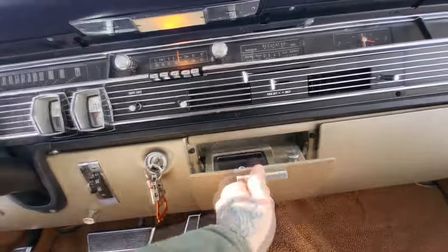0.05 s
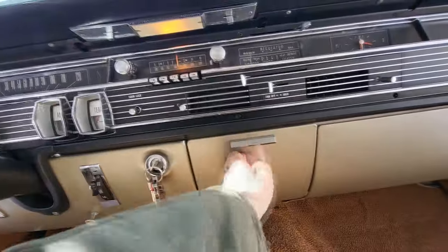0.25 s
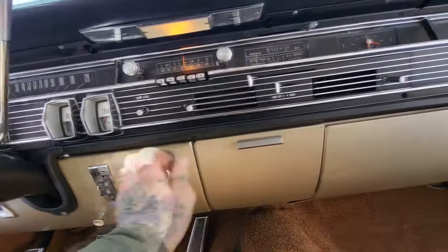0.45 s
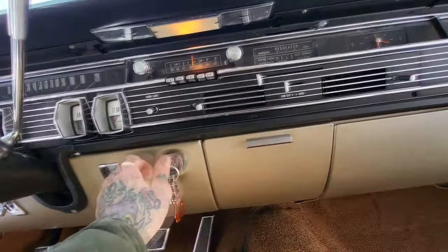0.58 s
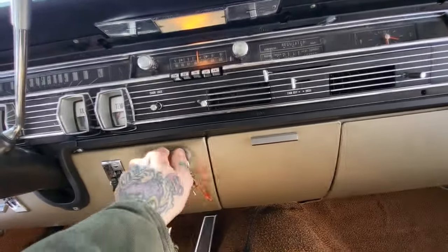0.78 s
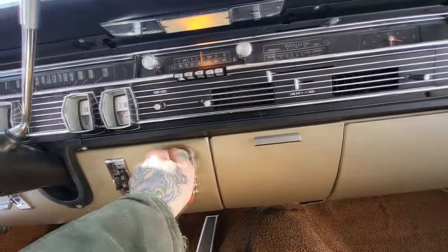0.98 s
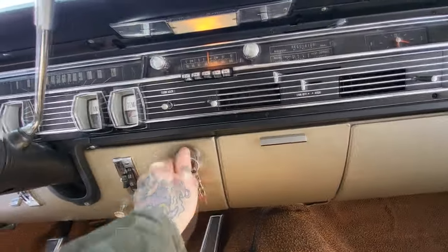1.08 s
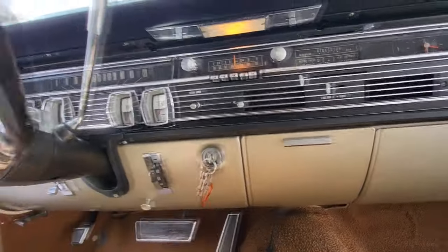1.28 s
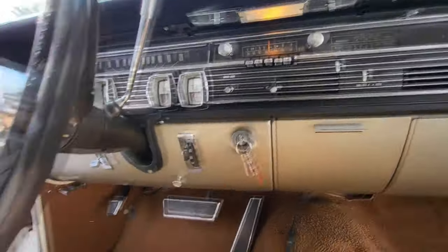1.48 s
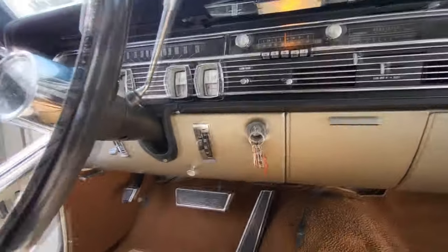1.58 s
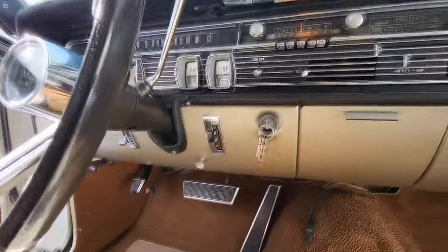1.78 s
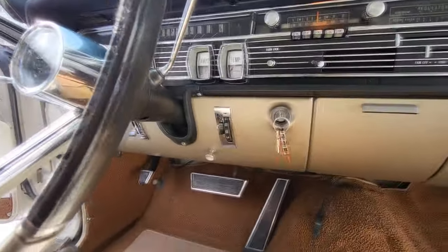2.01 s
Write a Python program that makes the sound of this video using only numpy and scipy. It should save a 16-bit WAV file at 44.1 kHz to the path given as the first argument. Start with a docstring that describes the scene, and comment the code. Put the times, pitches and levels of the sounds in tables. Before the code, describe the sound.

A glove box door slams shut, then keys jingle and click in a car's ignition.

```python
"""Clothes rustle over a low rumble in a quiet parked car, heard in stereo from the driver's seat.
An arm's length off, a metal glove box door is pushed shut: the latch scrapes, the door slams and rings,
and the cabin booms. The hand knocks on the dashboard and moves to the ignition: keys jingle, the lock
grinds and snaps, and a spring rings on. Soft bumps and a double clack follow as the person leans back.
Contacts are bursts of coloured noise; panels, metal parts and the cabin air ring as damped modes."""
import sys
import numpy as np
from scipy import signal
from scipy.fft import irfft, next_fast_len
from scipy.io import wavfile

SR = 44100
rng = np.random.default_rng(int(sys.argv[2]) if len(sys.argv) > 2 else 0)


def unload_audio(sound):
    """Save the sound as a 16-bit wav file, at the path given as the first command line argument."""
    columns = np.transpose(np.atleast_2d(sound))
    # keep every value between -1 and 1, then stretch to whole-number steps
    steps = np.round(np.clip(columns, -1, 1) * 32767)
    wavfile.write(sys.argv[1], SR, steps.astype(np.int16))


N = 90404
TIME = np.arange(N) / SR
LOW_CUT_HZ, HIGH_CUT_HZ = 52, 15900
PATH_SPREAD_S = .00008  # scatter of a mode's arrival at the two sides of the microphone

# swells of the clothes, the seat and the handling rumble: t/s, level/dB
RUSTLE_LEVELS = [(0, -46.5), (.07, -42), (.2, -42.5), (.33, -56), (.45, -55), (.63, -65), (.75, -64),
                 (1.08, -55), (1.19, -53.5), (1.3, -54.5), (1.42, -47), (1.6, -47), (1.72, -52),
                 (1.83, -48), (2.05, -53)]
SEAT_LEVELS = [(0, -48), (.2, -51.5), (.34, -38), (.48, -61), (.65, -60.5), (.8, -53), (1.0, -49.5),
               (1.2, -62), (1.42, -48), (1.5, -45.5), (1.67, -46.5), (1.8, -43), (2.05, -48)]
RUMBLE_LEVELS = [(0, -40), (.18, -37), (.45, -36.5), (.62, -42), (.8, -50.5), (1.0, -43.5), (1.15, -50),
                 (1.3, -43.5), (1.42, -48.5), (1.48, -32), (1.54, -45), (1.72, -42.5), (1.8, -35),
                 (2.05, -42.5)]
# spectra of those three: f/Hz, level/dB
RUSTLE_SPECTRUM = [(100, 2), (400, 2), (1000, 0.5), (2000, 2.5), (4000, -3.5), (6000, -6), (8000, -11),
                   (10000, -12.5), (15000, -14)]
SEAT_SPECTRUM = [(60, -10.5), (120, -2.5), (185, 2), (240, -2.5), (300, -4), (450, -6.5), (700, -18.5),
                 (2000, -53)]
RUMBLE_SPECTRUM = [(20, -57), (35, -0.5), (50, 0), (80, -4.5), (120, -22.5), (300, -36), (700, -57)]

# the latch rides over its catch: t/s, level/dB
LATCH_SCRAPES = [(0.216, -8), (0.222, -6), (0.2254, -4), (.229, -32)]
# the door strikes and chatters: t/s, clatter/dB, panel ring/dB, tilt/(dB per octave)
DOOR_STRIKES = [(0.2371, -11, -17.5, 1.5), (0.2438, -10, -20, 0.2), (0.2503, -12, -23, -0.6),
                (0.261, -13, -33, -0.8), (0.277, -18.5, -27, 0), (0.2827, -27.5, -48, 1.5)]
# the dashboard flexes and pumps the cabin air: t/s, level/dB
DASH_FLEXES = [(.2595, -12.5), (.2735, -12.5), (.316, -42), (.4295, -30.5)]
# the hand knocks on the dashboard: t/s, level/dB
DASH_KNOCKS = [(.399, -41), (.5245, -37), (.596, -47), (.881, -37)]
# soft bumps of hand, seat and body: t/s, level/dB, tilt/(dB per octave)
SOFT_BUMPS = [(.399, -43, -1.5), (.5252, -33.5, -4.5), (1.374, -35, -0.5), (1.474, -24.5, -7),
              (1.499, -26.5, -6.5), (1.608, -38.5, 6), (1.709, -31.5, -1.5), (1.777, -27, -2.5),
              (1.797, -41, 6), (1.933, -26.5, -8)]
# spectra of the scrape, the slam and the bumps: f/Hz, level/dB
LATCH_SPECTRUM = [(60, -24), (300, -2), (560, 3), (1000, -6), (2000, -3), (3800, -2), (6000, -12),
                  (9500, -11.5), (14000, -8.5)]
DOOR_SPECTRUM = [(50, 0), (140, 3), (500, -2), (1000, -1), (2000, -4), (4000, -7.5), (5800, -17.5),
                 (9000, -16), (15000, -18.5)]
BUMP_SPECTRUM = [(30, -16), (70, -7.5), (190, 6.5), (350, -7), (700, -18.5), (1500, -17.5), (2500, -32),
                 (8000, -59), (16000, -63)]
# resonances of the door panel, the cabin air and the dashboard: f/Hz, level/dB, t60/s
PANEL_MODES = [(115.3, 1, 0.11), (147.6, -7, .16), (289.8, -5, 0.13), (390, -0.5, 0.096), (431.6, 6, 0.068),
               (568, -12.5, 0.17), (626, -10.5, 0.098), (670, -10.5, 0.065), (822, -1.5, 0.1),
               (888, -8.5, 0.099), (1030, -19.5, 0.042), (1675, -12.5, .08), (1787, -8, 0.1),
               (3410, -8.5, 0.097), (3590, 0, .085), (4330, -17, .085)]
CABIN_AIR_MODES = [(50.8, -5, 0.58), (71, 1, 0.13), (91.7, -4, 0.21)]
DASHBOARD_MODES = [(185, 2.5, 0.088), (360, -9, .04), (573, -8, 0.045), (670, -24, 0.028)]

# the bunch of keys is handled, then dangles: t/s, level/dB, tilt/(dB per octave)
KEY_JINGLES = [(.683, -35, -0.5), (.6885, -36, -3), (.707, -37, 5), (.7124, -28, -1), (.7245, -30, -1),
               (.736, -33, 9), (.7455, -27.5, 0), (.7546, -24.5, -1), (.7661, -19, 0.8),
               (.7711, -27.5, -1.5), (.787, -41, -.5), (.8131, -40, 1), (.8501, -31.5, 1.5),
               (.8563, -30.5, -1), (.878, -51, 1.5), (.9472, -32.5, 11), (.9975, -24.5, 9)]
KEY_TICKS = [(1.129, -47, 0), (1.151, -40, 4), (1.183, -38, 1), (1.198, -36.5, 0), (1.216, -52, 4),
             (1.268, -39.5, 5), (1.358, -41.5, 6), (1.390, -41, 10), (1.452, -46, -1.5),
             (1.7505, -35.5, -3), (1.7715, -36.5, -5)]
# some touches set a key ringing: t/s, level/dB
KEY_CLINKS = [(.7242, -35.5), (.7546, -25), (.7661, -20.5), (.8131, -37.5), (.8563, -33)]
# the key grinds over the tumblers: t/s, level/dB
TUMBLER_GRINDS = [(.690, -37), (.857, -32), (0.869, -39), (0.9099, -28.5), (0.916, -32.5), (0.931, -35),
                  (.950, -36), (.958, -33.5)]
# the lock snaps and the key settles: t/s, click/dB, tilt/(dB per octave), barrel ring/dB
LOCK_SNAPS = [(0.774, -33.5, -3.5, -33.5), (0.9745, -9, 2.5, -16), (.981, -19.5, -6.5, -45),
              (1.11, -34.5, -3.5, -41), (1.1173, -28.5, -2, -41)]
# the snap strikes a spring, and the released key pings: t/s, level/dB
SPRING_STRIKES = [(.976, -44.5)]
KEY_PINGS = [(1.117, -28)]
# spectra of the jingle, the grinding and the snaps: f/Hz, level/dB
KEY_SPECTRUM = [(200, -5), (700, -8.5), (1500, -1.5), (3000, 1), (4500, 0), (6000, -5), (7800, -4),
                (10000, 0), (13000, 2), (16000, -5)]
GRIND_SPECTRUM = [(300, -22), (750, -3.5), (1150, 2), (1700, 3.5), (3200, -5), (5000, -10), (8000, -20.5),
                  (14000, -13.5)]
SNAP_SPECTRUM = [(100, -29), (550, -11), (900, -3.5), (1800, 0), (2700, 4), (3800, -0.5), (6000, -11),
                 (8000, -11.5), (10000, -7), (15000, -12.5)]
# resonances of the bunch, the lock barrel, its spring and the released key: f/Hz, level/dB, t60/s
BUNCH_MODES = [(3106, -20, 0.1), (4320, -18, 0.05), (4990, -6.5, 0.037), (7400, -7, 0.025),
               (7610, -10.5, 0.014), (7790, -3, 0.033), (11900, -18, .11), (12500, -33, .07),
               (13000, -17, .05)]
BARREL_MODES = [(566, -12, 0.046), (2622, 6, 0.05), (2970, -2, 0.053), (3240, -18, 0.046),
                (4060, -6.5, 0.094), (4260, -16, .06), (4560, -18, .06), (5240, 2, 0.023),
                (7660, -6, 0.022), (8060, -1, 0.05)]
LOCK_SPRING_MODES = [(288, 1.5, 0.58), (312, -5, 1.6), (925, -7, 0.42), (1860, -5, 0.42), (2200, -10, 1.2),
                     (2340, -11, 0.84), (2440, -5, 1.1), (2457, -3, 1.95), (2460, -2, 0.57)]
KEY_PING_MODES = [(2640, -10, 0.083), (2880, -3.5, 0.063), (2940, 3, 0.047), (4200, -3, 0.042)]

# a double clack and shudders of the seat springs as the person sits back: t/s, level/dB
DOUBLE_CLACK = [(1.4513, -20), (1.4612, -22)]
SEAT_SHUDDERS = [(1.461, -40.5), (1.53, -45), (1.60, -40.5)]
# spectrum of the clacks: f/Hz, level/dB
CLACK_SPECTRUM = [(80, -10), (200, 5.5), (400, -13), (900, -10), (1600, -10), (2300, -23), (5000, -34),
                  (15000, -48)]
# resonances of the seat springs: f/Hz, level/dB, t60/s
SEAT_SPRING_MODES = [(185.5, 2, 0.38), (211.4, -6, .2)]

# how alike the cabin sounds at the two sides of the microphone: f/Hz, correlation
STEREO_CORRELATION = [(60, 0.84), (300, 0.93), (700, 0.15), (1400, -0.22), (3000, 0.039), (15000, 0.021)]
# peaks and dips of the left and right microphone ports: f/Hz, gain/dB, Q
LEFT_PORT_BELLS = [(7510, 13, 3.3), (9740, -5.5, 2.4), (13500, -1, 1.5)]
RIGHT_PORT_BELLS = [(1300, 0, 0.5), (4280, 7, 5.1), (8400, -8.5, 1.21), (12400, 6.5, 2.5)]


def from_db(db):
    """Decibels to gain."""
    return 10 ** (np.asarray(db) / 20)


def at_hz(points, hz):
    """Read a table on a log-frequency axis."""
    points = np.array(points)
    return np.interp(np.log(hz), np.log(points[:, 0]), points[:, 1])


def pan(x, left_db):
    """Place a sound by how much louder it is on the left."""
    return x * from_db([[left_db / 2], [-left_db / 2]])


def noise(spectrum, size, tilt_db=0):
    """Coloured stereo noise of rms 1, alike on both sides in the bass and diffuse in the treble."""
    hz = np.maximum(np.fft.rfftfreq(size, 1 / SR), 1)
    alike = np.clip(at_hz(STEREO_CORRELATION, hz), -.99, .99)
    mid, side = np.exp(2j * np.pi * rng.random((2, len(hz))))
    stereo = np.sqrt(1 + alike) * mid + np.sqrt(1 - alike) * side * [[1], [-1]]
    gain = from_db(at_hz(spectrum, hz) + tilt_db * np.log2(hz)) * (hz < HIGH_CUT_HZ) * (hz > 20)
    x = irfft(gain * stereo, size)
    return x / np.sqrt(np.mean(x ** 2))


def movement_noise(levels, spectrum, flutter_db, flutter_hz):
    """Noise that follows a level curve and flutters at random."""
    flutter = np.interp(TIME * flutter_hz, np.arange(N), rng.standard_normal(N))
    level_db = np.interp(TIME, *np.transpose(levels)) + flutter_db * flutter
    return from_db(level_db) * noise(spectrum, next_fast_len(N))[:, :N]


def contacts(rows, spectrum, attack_s, crack_t60, tail_db, tail_t60, size=8192):
    """Each contact (t/s, level/dB, optional tilt) is a noise burst: a crack, then a tail in the cabin."""
    out, t = np.zeros((2, N)), TIME[:size]
    crack, tail = from_db(-60 * t / crack_t60), from_db(tail_db - 60 * t / tail_t60)
    envelope = (1 - np.exp(-t / attack_s)) * np.hypot(crack, tail)
    for s, db, *tilt in rows:
        burst = from_db(db) * envelope * noise(spectrum, size, *tilt)
        start = int(s * SR)
        out[:, start:start + size] += burst[:, :N - start]
    return out


def ring(hits, modes, spread_db):
    """Hits (t/s, level/dB) ring a body's modes, each with random strengths and paths to the microphone."""
    s, db = np.transpose(hits)
    lags = np.round(PATH_SPREAD_S * SR * rng.standard_normal((len(modes), 2))).astype(int)
    scatter_db = spread_db * rng.standard_normal((len(s), len(modes)))
    out = np.zeros((2, N))
    for k, (hz, mode_db, t60) in enumerate(modes):
        impulses = np.full((2, N), 1e-18)
        for side in range(2):
            impulses[side, (s * SR).astype(int) + lags[k, side]] = from_db(db + mode_db + scatter_db[:, k])
        r, w = from_db(-60 / (t60 * SR)), 2 * np.pi * hz / SR  # decay and phase step per sample
        out += signal.lfilter([0, np.sin(w)], [1, -2 * r * np.cos(w), r * r], impulses)
    return out


def person_moving():
    """Close to the microphone, clothes rub and the seat shifts over a handling rumble."""
    rustle = movement_noise(RUSTLE_LEVELS, RUSTLE_SPECTRUM, flutter_db=1.36, flutter_hz=98)
    seat = movement_noise(SEAT_LEVELS, SEAT_SPECTRUM, flutter_db=4.0, flutter_hz=60)
    rumble = movement_noise(RUMBLE_LEVELS, RUMBLE_SPECTRUM, flutter_db=4.7, flutter_hz=14.77)
    return rustle + seat + pan(rumble, left_db=3)


def glove_box():
    """Across the cabin the latch scrapes, the door slams, its panel rings and the enclosed air booms."""
    latch = contacts(LATCH_SCRAPES, LATCH_SPECTRUM,
                     attack_s=0.0019, crack_t60=0.012, tail_db=-7.5, tail_t60=0.034)
    slam = contacts([(s, db, tilt) for s, db, _, tilt in DOOR_STRIKES], DOOR_SPECTRUM,
                    attack_s=0.0016, crack_t60=0.035, tail_db=-3, tail_t60=0.095)
    panel = ring([(s, db) for s, _, db, _ in DOOR_STRIKES], PANEL_MODES, spread_db=3.9)
    boom = ring(DASH_FLEXES, CABIN_AIR_MODES, spread_db=1.8)
    return pan(latch + slam, left_db=-2.5) + pan(panel + boom, left_db=1.9)


def dashboard_knocks():
    """The hand sets the dashboard ringing, low and short."""
    return ring(DASH_KNOCKS, DASHBOARD_MODES, spread_db=2.5)


def soft_bumps():
    """Hand, seat and body make dull thuds nearby."""
    return contacts(SOFT_BUMPS, BUMP_SPECTRUM,
                    attack_s=0.00052, crack_t60=0.042, tail_db=-15, tail_t60=0.29)


def keys():
    """Just right of centre, keys jingle in the hand, then swing from the lock and tick."""
    jingle = contacts(KEY_JINGLES, KEY_SPECTRUM,
                      attack_s=0.00088, crack_t60=0.015, tail_db=-3.5, tail_t60=0.079)
    ticks = contacts(KEY_TICKS, KEY_SPECTRUM, attack_s=.0003, crack_t60=0.015, tail_db=-6.5, tail_t60=0.1)
    clinks = ring(KEY_CLINKS, BUNCH_MODES, spread_db=3)
    return pan(jingle + ticks + clinks, left_db=-1.9)


def ignition_lock():
    """A little to the right, the key grinds in the lock, snaps home and is let go; a spring rings on."""
    grind = contacts(TUMBLER_GRINDS, GRIND_SPECTRUM,
                     attack_s=0.0013, crack_t60=0.07, tail_db=-7, tail_t60=0.078)
    snaps = contacts([row[:3] for row in LOCK_SNAPS], SNAP_SPECTRUM,
                     attack_s=0.0014, crack_t60=0.031, tail_db=-9.5, tail_t60=0.12)
    barrel = ring([(s, db) for s, _, _, db in LOCK_SNAPS], BARREL_MODES, spread_db=1.6)
    spring = ring(SPRING_STRIKES, LOCK_SPRING_MODES, spread_db=2.3)
    ping = ring(KEY_PINGS, KEY_PING_MODES, spread_db=1.5)
    return pan(grind + snaps + barrel + spring + ping, left_db=-2.5)


def sitting_back():
    """Something hard clacks twice and the seat springs shudder."""
    clacks = contacts(DOUBLE_CLACK, CLACK_SPECTRUM,
                      attack_s=0.00026, crack_t60=0.021, tail_db=-15, tail_t60=0.092)
    return clacks + ring(SEAT_SHUDDERS, SEAT_SPRING_MODES, spread_db=3)


def scene():
    """The cabin as heard from the driver's seat."""
    up_front = glove_box() + keys() + ignition_lock() + dashboard_knocks()
    return up_front + person_moving() + soft_bumps() + sitting_back()


def microphone_port(x, bells):
    """One port colours its side through a chain of bell filters."""
    for hz, db, q in bells:
        a, w = from_db(db / 2), 2 * np.pi * hz / SR
        k = np.sin(w) / (2 * q)
        zeros = [1 + k * a, -2 * np.cos(w), 1 - k * a]
        poles = [1 + k / a, -2 * np.cos(w), 1 - k / a]
        x = signal.lfilter(zeros, poles, x)
    return x


def record(dry):
    """The stereo microphone colours each side, loses the lowest bass, rounds peaks and cuts the top."""
    x = np.array([microphone_port(dry[0], LEFT_PORT_BELLS), microphone_port(dry[1], RIGHT_PORT_BELLS)])
    low_cut = signal.butter(3, LOW_CUT_HZ, "high", fs=SR, output="sos")
    high_cut = signal.ellip(10, .2, 80, HIGH_CUT_HZ, fs=SR, output="sos")
    rounded = np.tanh(signal.sosfilt(low_cut, x))
    return signal.sosfilt(high_cut, rounded)


dry = scene()
out = record(dry)
unload_audio(out)
```